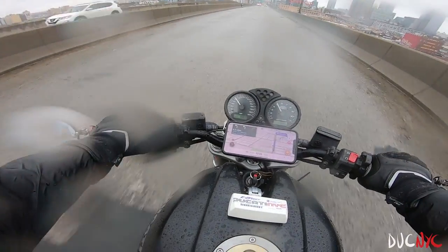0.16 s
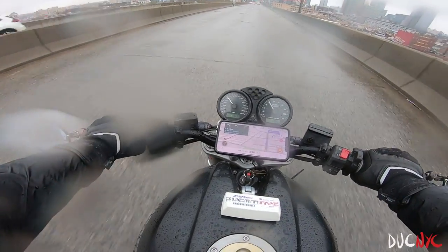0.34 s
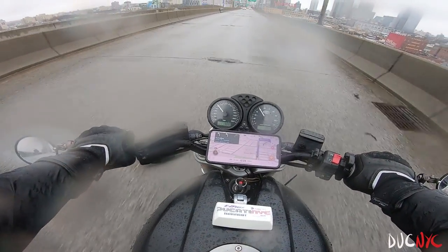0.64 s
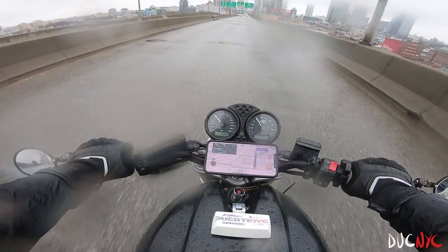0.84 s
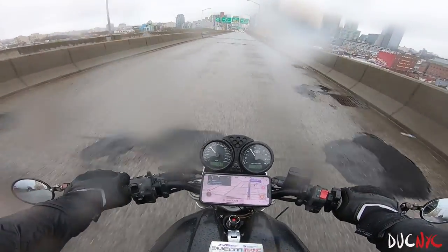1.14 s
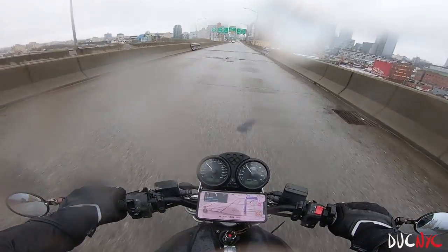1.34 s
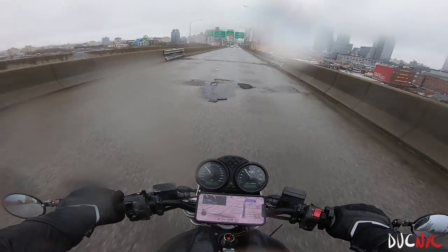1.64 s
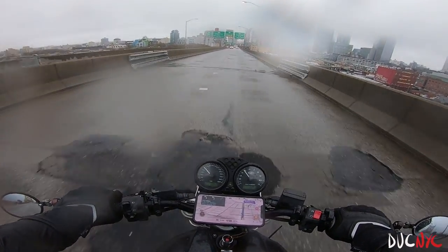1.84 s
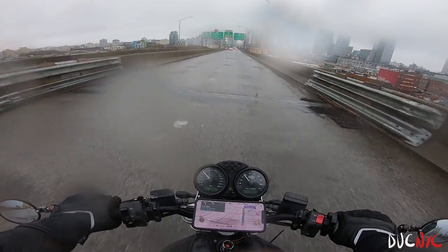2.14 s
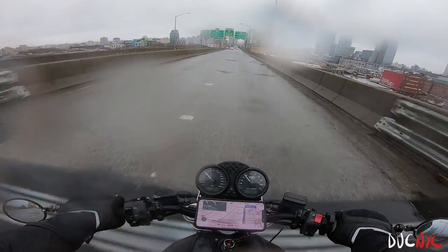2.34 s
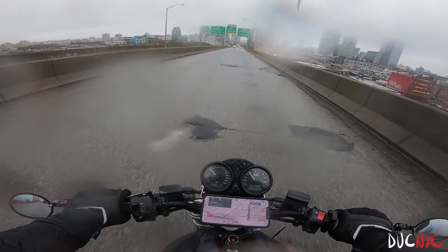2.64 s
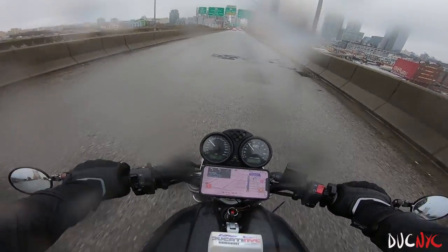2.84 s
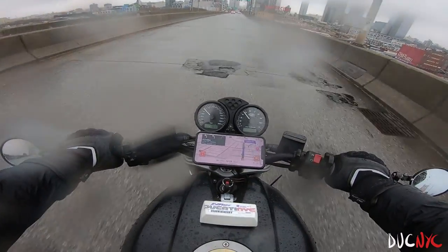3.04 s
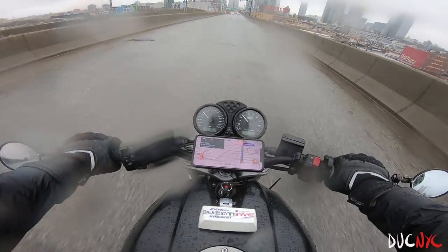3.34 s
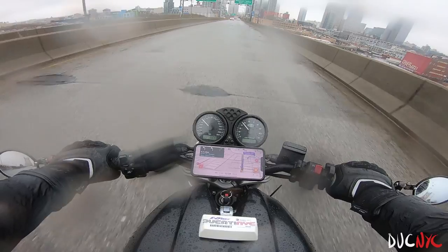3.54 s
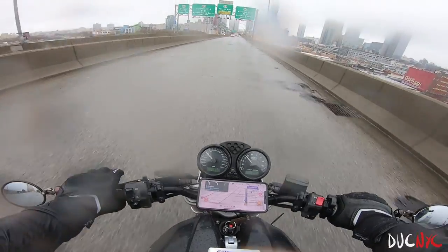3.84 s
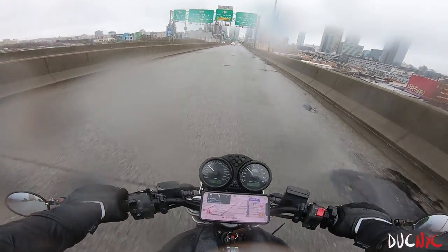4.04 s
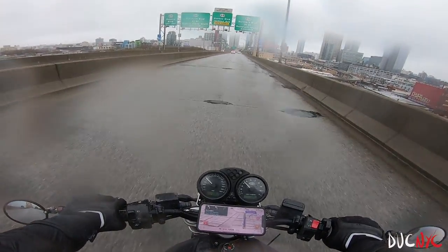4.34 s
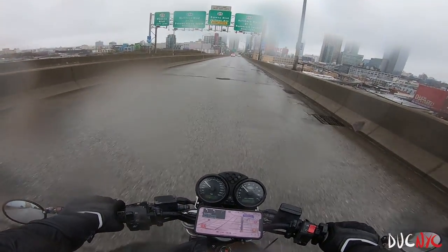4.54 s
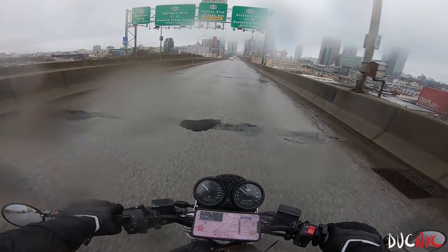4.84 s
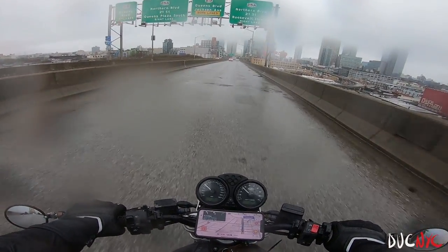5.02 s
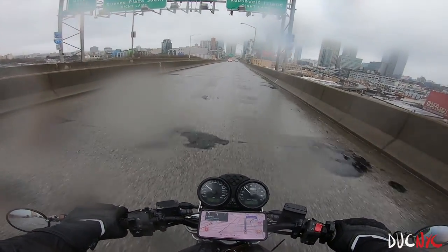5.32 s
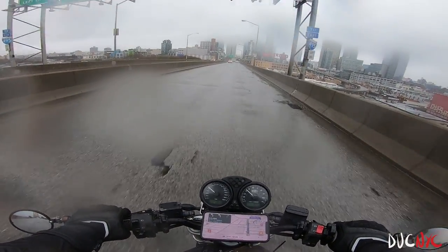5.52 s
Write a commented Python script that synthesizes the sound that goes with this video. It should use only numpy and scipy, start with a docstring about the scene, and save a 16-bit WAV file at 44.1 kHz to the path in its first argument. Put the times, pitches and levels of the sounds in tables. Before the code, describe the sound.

A motorcycle's twin engine drones and slowly drops in pitch amid rushing wind and wet tyre hiss, until the sound breaks up into pops and gaps.

```python
"""A V-twin exhaust drones as a motorcycle slowly loses speed on a wet highway, heard from the rider's seat.
Its notes are sums of cosines on one firing-cycle phase, as are low beating hums and a thin chain note.
Wind and tyre spray are coloured noise; engine metal is resonant noise plus a whine; drops tick as bursts of hiss.
Near the end the microphone's connection breaks up: silences, overload pops, a stuck buzz and thin fizz."""
import sys
import numpy as np
from scipy import signal
from scipy.fft import rfft, irfft
from scipy.io import wavfile

SR = 44100
rng = np.random.default_rng(int(sys.argv[2]) if len(sys.argv) > 2 else 0)


def persist_wave(psi):
    """Save psi, clipped to +-1, as 16-bit WAV."""
    counts = np.round(np.clip(psi, -1, 1) * 32767).astype(np.int16)
    wavfile.write(sys.argv[1], SR, np.atleast_2d(counts).T)


N = 250488
TIME = np.arange(N) / SR
BINS = np.fft.rfftfreq(N, 1 / SR)

# Ringing of the engine metal. Each row: time in seconds, change of the low ring in dB, of the high ring in dB.
RING_CHANGE = [(0, -8, -7), (.65, 0, -7), (1.1, -4, -4), (1.28, -2, 5), (1.52, -1, -1), (1.86, 4, 3.5),
               (2.15, -1, -3), (2.4, 1, -1), (2.65, -3, -2), (2.82, -1, 1), (3.05, 0, -10), (3.75, -2, -7),
               (4.05, -5, 0), (4.4, -2, -5), (4.7, 2.5, -4), (5.1, -3, -3)]
# Stretches in which the connection holds. Each row: start in seconds, end in seconds, scale of the offset,
# swing of the pop at the break (both as shares of full scale).
CONTACT_STRETCHES = [(0, 4.8433, -0.032, -0.015), (4.982, 5.003, 0.082, -0.44), (5.052, 5.0616, 0.48, 0.46),
                     (5.096, 5.419, 0.43, 0), (5.445, 5.4566, 0, -0.26), (5.46, 5.4835, -.06, -.25),
                     (5.543, 5.547, .25, 0.2), (5.595, 5.6103, .33, 0.38), (5.665, 5.7, .35, 0)]
# Looped scraps of sound. Each row: start in seconds, end in seconds, start level in dB, end level in dB, pitch in Hz,
# roughness 0-1, swing of the opening pop, of the closing pop (shares of full scale).
BUZZ_STRETCHES = [(5.436, 5.4597, -35, -12.5, 188.1, 0.81, 0, 0.049),
                  (5.4868, 5.521, -9.5, -9.5, 187.5, .04, -0.99, -0.089),
                  (5.562, 5.5675, -8, -8, 280, 0.4, 0.83, 0.6)]
# Input overloads. Each row: start in seconds, time stuck at the lower rail in seconds, depth,
# swing of the opening kick (both as shares of full scale, ahead of the soft limit).
OVERLOAD_EVENTS = [(5.0463, .0025, 1.2, 2.5), (5.0888, .0052, 1.05, 1.85), (5.5383, .0027, 1.15, 2.0),
                   (5.6593, .005, .68, 0)]


def amp(db):
    """Decibels to gain."""
    return 10 ** (np.asarray(db) / 20)


def unit(x):
    """Scales to an rms of one."""
    return x / np.sqrt(np.mean(abs(x) ** 2) + 1e-20)


def cosine(turns):
    """Cosine of a phase in turns."""
    return np.cos(2 * np.pi * turns)


def curves(rows):
    """Each column of a table, joined by straight lines in time."""
    s, *columns = np.transpose(rows)
    return [np.interp(TIME, s, column) for column in columns]


def gain_at(spectrum, hz):
    """Reads a spectrum as gain, with dB joined on a log-frequency axis."""
    f, db = np.transpose(spectrum)
    return amp(np.interp(np.log(hz + 1), np.log(f + 1), db))


def colour(x, spectrum):
    """Filters x by a spectrum."""
    return irfft(rfft(x) * gain_at(spectrum, BINS), N)


def noise(spectrum):
    """Coloured noise of rms one."""
    return unit(colour(rng.standard_normal(N), spectrum))


def wander(hz):
    """Slow chance of rms one, with changes up to about hz a second."""
    lowpass = 1 / (1 + (BINS / hz) ** 4)
    return unit(irfft(rfft(rng.standard_normal(N)) * lowpass, N))


def ring(x, modes):
    """Passes x, scaled to rms one, through resonances (Hz, width Hz, dB)."""
    body = sum(amp(db) * unit(1 / (1 + 1j * (BINS - hz) / width) ** 2) for hz, width, db in modes)
    return irfft(rfft(unit(x)) * body, N)


def between(start, end):
    """One inside a stretch of time, zero outside."""
    return (TIME >= start) * (TIME < end)


def add(mix, s, sound):
    """Lays a sound into the mix at s seconds."""
    part = mix[max(round(s * SR), 0):][:len(sound)]
    part += sound[:len(part)]


def thinned():
    """Zero until the first overload, one after it."""
    return 1. * (TIME >= OVERLOAD_EVENTS[0][0])


def gust_db():
    """Lift of the air's rush as the microphone dips into the airflow and out: rounded, flat-topped swells."""
    # Each row: middle in seconds, half length in seconds, change of the rush in dB.
    gusts = [(.5, 0.5, 1.5), (1.25, .12, -1.5), (2.52, .1, -0.5), (2.96, 0.1, 1.0), (3.3, .5, 1.8),
             (3.95, .1, -1.2), (4.5, 0.41, 2)]
    return sum(db * np.exp(-((TIME - s) / half_s) ** 4) for s, half_s, db in gusts)


def exhaust(cycles, drone_db=-14.5, overtone_db=-15.7, jitter_cycles=.0012, lag_turns=1.8, waver_db=0.62,
            uneven=.04, uneven_shut=.17, lift_db_per_gust_db=.15, count=44):
    """Lines on multiples of the firing cycle; throttle sets their balance, firing strength varies."""
    # Each row: multiple of the cycle rate, level in dB with the throttle eased, held, shut,
    # level in dB once the sound is thin.
    overtones = [(3, -8, -12.5, -4, -11.5), (4, -16.5, -15, -15, -13), (5, -10.8, -26, -29, -19.5),
                 (6, -26, -18, -24, -18), (7, -17.5, -17, -22.5, -24), (8, -12.5, -19, -12.5, -17),
                 (9, -17.5, -17, -10, -33), (10, -32, -15, -26, -16.5), (11, -21, -22.5, -25, -21.5),
                 (12, -24, -24, -20, -21), (13, -29, -32, -31, -24.5), (14, -37, -27, -31, -28),
                 (15, -34, -36, -37, -24), (17, -39, -38, -36, -37), (21, -38, -35, -37, -38),
                 (22, -44, -42, -42, -42), (23, -35, -33, -40, -42), (25, -43, -42, -42, -42),
                 (44, -60, -56, -52, -56)]
    # Each row: time in seconds, throttle (-1 shut, 0 eased, 1 held).
    throttle_moves = [(1.0, 0.095), (1.3, 0.44), (1.62, 1), (1.85, 0.9), (2.0, .45), (2.45, .45),
                      (2.62, 0.82), (3.3, 0.91), (3.55, 0.97), (3.95, 0.96), (4.2, -.7), (4.45, -1.1),
                      (4.58, -0.98), (4.82, -.3), (5.0, -0.038)]
    throttle, = curves(throttle_moves)
    held, shut, thin = np.clip(throttle, 0, 1), np.clip(-throttle, 0, 1), thinned()
    multiples, *notes = np.transpose(overtones)
    turns = cycles + jitter_cycles * wander(21)
    drone = amp(drone_db) * cosine(2 * turns)  # two crank turns a cycle
    out = np.zeros(N)
    for k in range(3, count + 1):
        eased_db, held_db, shut_db, thin_db = (np.interp(k, multiples, note) for note in notes)
        throttle_db = (1 - held - shut) * eased_db + held * held_db + shut * shut_db
        db = np.where(thin, thin_db, throttle_db)
        # the second cylinder fires three eighths of a cycle after the first; only its phase effect is kept
        twin_rad = np.angle(1 + .9 * np.exp(-2j * np.pi * k * 3 / 8))
        # the pipes hold the low notes back and smear each beat
        phase_rad = 2 * np.pi * (k * turns - lag_turns * np.log(k)) + twin_rad
        # moving air makes the overtones waver
        out += amp(db + overtone_db + waver_db * wander(2.8)) * np.cos(phase_rad)
    strength = 1 + (uneven + (uneven_shut - uneven) * shut) * wander(19)
    return np.sqrt(2) * (drone + out * strength) * amp(lift_db_per_gust_db * gust_db())


def wind(cycles, buffet_db=-23, rush_db=-28.5, follow=0.45, throb_db=0.5):
    """Pressure lumps on the microphone, a low boom, and a rush that gusts, flutters and throbs with the engine."""
    # Each row: frequency in Hz, relative density in dB per Hz.
    buffet_colour = [(2.5, -4), (8, 4), (15, 0), (28, -4), (56, -8), (105, -13), (210, -31), (520, -72),
                     (1000, -100)]
    rush_colour = [(33, -39), (86, -3), (150, 0), (205, -3), (260, -2), (380, -1.5), (525, -4.5),
                   (665, -7.5), (860, -9.5), (1100, -14), (1400, -16.5), (1600, -20.5), (1800, -23.5),
                   (2300, -27), (5150, -32.5), (14900, -71), (16500, -100)]
    boom_colour = [(55, -27), (88, 1), (102, 1.5), (145, -0.5), (175, -5), (215, -22.5), (400, -60),
                   (900, -100)]
    # Each row: time in seconds, level of the boom in dB.
    boom_level = [(0, -32), (2.0, -30.5), (3.2, -27.5), (4.4, -26), (5.2, -34)]
    flutter = amp(.7 * wander(25) + .9 * wander(150))
    throb = amp(throb_db * cosine(cycles - 3 / 8))
    rush = unit(noise(rush_colour) * flutter * throb)
    boom_db, = curves(boom_level)
    lumps = amp(buffet_db + follow * (boom_db - boom_db.mean())) * noise(buffet_colour)
    boom = amp(boom_db) * noise(boom_colour)
    return lumps + boom + amp(rush_db + gust_db()) * rush


def spray(cycles, flicker_db=1.0, throb_db=0.93):
    """Tyres tear water off the road as a wide hiss, which throbs slightly with the engine."""
    # Each row: frequency in Hz, relative density in dB per Hz.
    spray_colour = [(1120, -39), (1900, -16.5), (2350, -7.5), (2860, -2), (3380, -4.5), (4070, -3),
                    (4420, -5), (7240, -3.5), (10300, -9), (11600, -12.5), (15100, -33), (16100, -56),
                    (16700, -87), (17500, -87)]
    # The hiss dips and swells along the ride. Each row: time in seconds, level in dB.
    spray_level = [(0, -39.5), (.68, -40), (.95, -38.5), (1.9, -38), (2.8, -38.5), (2.95, -40.2),
                   (3.75, -39.8), (3.92, -37.3), (4.8, -37.5), (5.1, -38.5)]
    level_db, = curves(spray_level)
    level_db = level_db + flicker_db * wander(50) + throb_db * cosine(2 * cycles)
    return amp(level_db) * noise(spray_colour)


def hums(cycles, drift_turns=0.21, waver_db=2.0):
    """Wavering hums just above the drone and its octave follow the speed and beat against them."""
    # Each row: multiple of the cycle rate, relative level in dB.
    hum_lines = [(2.35, 0), (4.35, -6)]
    # Each row: time in seconds, level of the hums in dB.
    hum_level = [(0, -38), (1.1, -39), (2.0, -30), (2.5, -33), (2.9, -25), (3.7, -27.5), (4.6, -28.5),
                 (5.1, -39)]
    lines = sum(amp(db) * cosine(k * cycles + drift_turns * wander(3)) for k, db in hum_lines)
    waver = unit(amp(waver_db * wander(5)))
    return np.sqrt(2) * amp(curves(hum_level)[0]) * waver * lines


def hollow(lift_db_per_gust_db=1.2, lumps_db=2.0):
    """Air passing the bars and dials sounds hollow notes, which swell in rough lumps with the gusts."""
    # Each row: frequency in Hz, width in Hz, level in dB between gusts.
    hollow_modes = [(685, 31, -47), (825, 53, -42.5), (1260, 77, -50.5), (1722, 35, -56.5)]
    lumps = unit(amp(lumps_db * wander(12)))
    return amp(lift_db_per_gust_db * gust_db()) * lumps * ring(rng.standard_normal(N), hollow_modes)


def knocks(blur_turns=0.16, rise_s=.0008, decay_s=.0042):
    """Short knocks in the rush of air: dull, unsteady notes that start at once and die quickly."""
    # Each row: start in seconds, relative level in dB, pitch in Hz.
    knock_events = [(3.2305, -14, 800), (3.447, -24, 850), (4.6205, -24, 880)]
    out = np.zeros(N)
    for s, db, hz in knock_events:
        t = np.maximum(TIME - s, 0)
        envelope = (1 - np.exp(-t / rise_s)) * np.exp(-t / decay_s)
        out += amp(db) * envelope * np.sin(2 * np.pi * (hz * t + blur_turns * wander(150)))
    return out


def chain(cycles, links_per_cycle=12.16, waver_db=1.5):
    """The drive chain meshes with its sprocket: a thin note locked to engine speed, between its overtones."""
    # Each row: time in seconds, level in dB.
    chain_level = [(0, -35), (1.0, -35), (1.5, -42), (2.0, -39), (2.7, -42), (4.7, -43), (5.1, -55)]
    level_db = curves(chain_level)[0] + waver_db * wander(6)
    return np.sqrt(2) * amp(level_db) * cosine(links_per_cycle * cycles)


def metal(cycles, beat_db=-0.8, uneven_db=0.5):
    """Valve gear rattles the cases twice a cycle, one cylinder harder; the ring comes and goes."""
    # Each row: frequency in Hz, width in Hz, level in dB ahead of the ring's changes.
    low_modes = [(1745, 22, -56), (2935, 90, -56)]
    high_modes = [(3950, 90, -58), (4208, 26, -52), (5925, 250, -56), (7075, 170, -56), (10480, 200, -61)]
    beat = amp(beat_db * cosine(2 * cycles) + uneven_db * cosine(cycles))
    rattle = rng.standard_normal(N) * beat
    low_db, high_db = curves(RING_CHANGE)
    return amp(low_db) * ring(rattle, low_modes) + amp(high_db) * ring(rattle, high_modes)


def whine(hz=2925, base_db=-54.5, drift_turns=.12):
    """A thin mechanical note near the low ring's upper mode holds its pitch and swells with that ring."""
    level = amp(base_db + curves(RING_CHANGE)[0])
    return np.sqrt(2) * level * cosine(hz * TIME + drift_turns * wander(16))


def drops(near_db=-3, splash_s=0.0017, small_per_s=36, small_db=-38, spread_db=3):
    """Each drop bursts in a millisecond or two of hiss: a few large ones, and many small."""
    # Near drops. Each row: start in seconds, relative level in dB.
    near_drops = [(0.0706, -19), (0.2678, -25), (0.3723, -15), (0.405, -24), (0.8545, -17), (0.874, -20),
                  (1.8834, -18), (2.753, -20), (2.7975, -19)]
    # Each row: frequency in Hz, gain in dB.
    drop_colour = [(2100, -24), (4400, -11), (6000, -1), (8400, 0), (11200, -5), (13400, -14), (15500, -26),
                   (16800, -60)]
    t = np.arange(SR // 100) / SR
    small = amp(small_db + spread_db * np.minimum(rng.exponential(1, N), 3))
    hits = (rng.random(N) < small_per_s / SR) * small
    for s, db in near_drops:
        add(hits, s, amp([db + near_db]))
    splashes = signal.oaconvolve(hits, np.exp(-t / splash_s))[:N]
    return colour(splashes * rng.standard_normal(N), drop_colour)


def broken_link(x, rise_s=0.0071, settle_s=0.066, tail_db=-20, tail_s=.018):
    """Sound passes in contact, thin once overloaded, with an offset that swells and drains on each return.
    A faint, thin tail of the sound fades after each break."""
    # The thin sound. Each row: frequency in Hz, gain in dB.
    weak_colour = [(80, -21.5), (130, -15), (350, -10.5), (1500, -11.5), (8000, -13.5)]
    weak = colour(x, weak_colour)
    x = np.where(thinned(), weak, x)
    out = np.zeros(N)
    for start, end, offset, _ in CONTACT_STRETCHES:
        t = np.maximum(TIME - start, 0)
        swell = offset * (1 - np.exp(-t / rise_s)) * np.exp(-t / settle_s)
        out += between(start, end) * (x + swell)
        out += (TIME >= end) * amp(tail_db) * np.exp(-abs(TIME - end) / tail_s) * weak
    return out


def pop(edge, swing, edge_s=0.00022, swing_s=0.00073, swing_delay_s=.00009):
    """A sharp decaying edge and the rounded swing that follows it."""
    t = np.arange(SR // 50) / SR
    u = np.maximum(t - swing_delay_s, 0) / swing_s
    return edge * np.exp(-t / edge_s) + swing * u * np.exp((1 - u ** 2) / 2)


def pops(break_edge=0.89, buzz_edge=1.6, stop_edge=0.49):
    """The line pops when contact breaks, and when a buzz sets in or stops; edges are shares of the swing."""
    out = np.zeros(N)
    for _, end, _, size in CONTACT_STRETCHES:
        add(out, end, pop(-break_edge * size, size))
    for start, end, *_, opening, closing in BUZZ_STRETCHES:
        add(out, start, pop(-buzz_edge * opening, opening))
        add(out, end, pop(-stop_edge * closing, closing))
    return out


def overloads(kick_edge=0.15, spike=1.6, recoil=0.21, linger_s=0.002, release_s=0.0005):
    """The input kicks, sticks at its lower rail, spikes as it comes free and lets go a moment later."""
    t, out = np.arange(SR // 50) / SR, np.zeros(N)
    for s, stuck_s, depth, kick in OVERLOAD_EVENTS:
        rail = depth * (1 - np.tanh((t - stuck_s - linger_s) / release_s)) / 2
        add(out, s, pop(-kick_edge * kick, kick) - rail)
        add(out, s + stuck_s, pop(spike, -recoil))
    return out


def buzz(settle_s=.006, count=28):
    """One short period loops while the link is lost; it starts ragged, then settles."""
    # Each row: frequency in Hz, relative level in dB.
    loop_colour = [(188, 0), (375, -7), (563, -18), (750, -8), (938, -20), (1125, -22), (1313, -29),
                   (1500, -24), (1790, -32), (3450, -36), (4550, -48), (5500, -70)]
    grit_colour = [(50, -23), (120, 0), (310, -0.5), (730, -8), (1620, -14), (2470, -25), (3540, -26),
                   (5600, -42), (12000, -50), (16000, -75)]
    grit, out = noise(grit_colour), np.zeros(N)
    for start, end, first_db, last_db, hz, rough, *_ in BUZZ_STRETCHES:
        t = np.arange(0, max(end - start, .002), 1 / SR)
        lines_hz = hz * np.arange(1, count + 1)
        loop = gain_at(loop_colour, lines_hz) @ cosine(np.outer(lines_hz, t) + rng.random((count, 1)))
        grit_share = np.clip(rough + (1 - rough) * np.exp(-t / settle_s), 0, 1)
        grit_part = unit(np.interp(start + t, TIME, grit))
        sound = np.sqrt(1 - grit_share ** 2) * unit(loop) + grit_share * grit_part
        add(out, start, sound * amp(np.linspace(first_db, last_db, len(t))))
    return out


def fizz():
    """A thin high hiss sounds around some of the gaps."""
    # Each row: start in seconds, end in seconds, level in dB.
    fizz_stretches = [(4.846, 4.9078, -41), (5.423, 5.456, -60), (5.6358, 5.6366, -16)]
    # Each row: frequency in Hz, relative density in dB per Hz.
    fizz_colour = [(100, -34), (9900, -42), (11000, -14), (12100, 0), (13100, -3), (14300, -12),
                   (15900, -22), (16600, -48)]
    level = sum(amp(db) * between(start, end) for start, end, db in fizz_stretches)
    filter_rms = np.sqrt(np.mean(gain_at(fizz_colour, BINS) ** 2))
    return colour(level * rng.standard_normal(N), fizz_colour) / filter_rms


def scene(weak_wind_db=-3.5):
    """Engine, chain, air and water at the microphone; once overloaded, the air falls further than the engine."""
    # Firing cycles, one for two crank turns. Each row: time in seconds, rate in cycles per second.
    speed = [(0.0, 43.5), (0.65, 42.7), (1.27, 41.7), (1.4, 42.2), (2.06, 40.6), (2.3, 41.3), (2.49, 40.7),
             (3.03, 40.3), (3.41, 39.5), (3.56, 40.0), (3.92, 39.5), (4.14, 38.3), (4.46, 38.5),
             (4.52, 38.1), (4.69, 38.0), (4.84, 38.8), (5.1, 37.7)]
    cycles = np.cumsum(curves(speed)[0]) / SR
    machine = exhaust(cycles) + chain(cycles) + metal(cycles) + whine()
    air = wind(cycles) + hums(cycles) + hollow() + knocks()
    air = air * amp(weak_wind_db * thinned())
    return (machine + air + spray(cycles) + drops())[None]


def record(dry, floor_db=-84, edge_hz=17800):
    """The failing connection over a noise floor, a soft limit at full scale, then the band limit."""
    floor = amp(floor_db) * rng.standard_normal(N)
    x = broken_link(dry[0]) + pops() + overloads() + buzz() + fizz() + floor
    x = x / (1 + x ** 8) ** (1 / 8)
    lowpass = signal.firwin(255, edge_hz, window=("kaiser", 9), fs=SR)
    return signal.oaconvolve(x, lowpass, "same")[None]


dry = scene()
out = record(dry)
persist_wave(out)
```